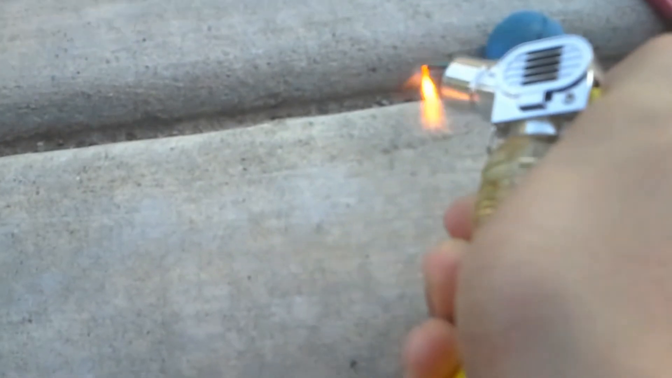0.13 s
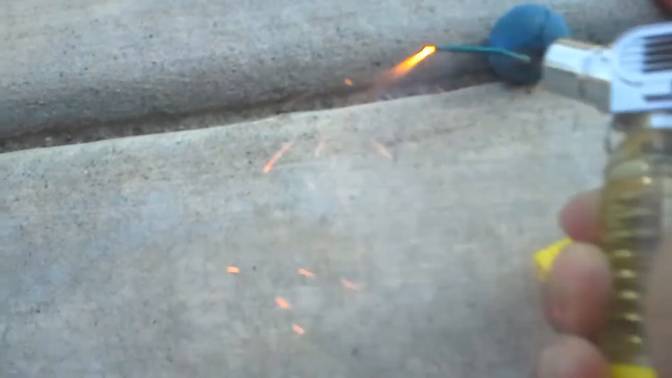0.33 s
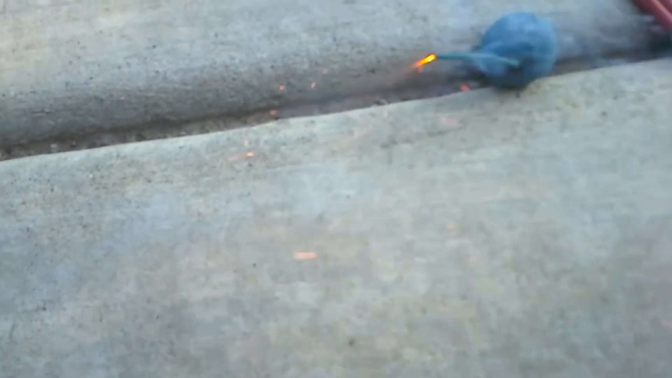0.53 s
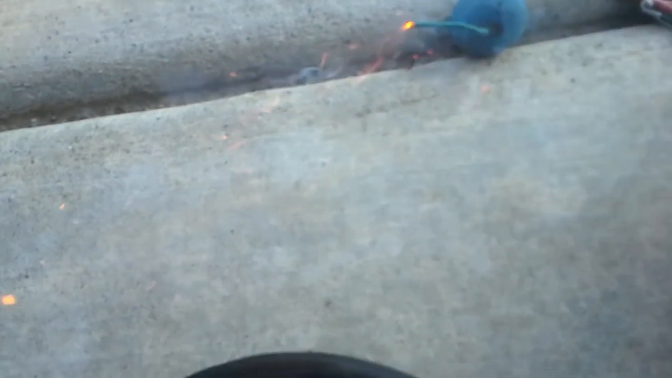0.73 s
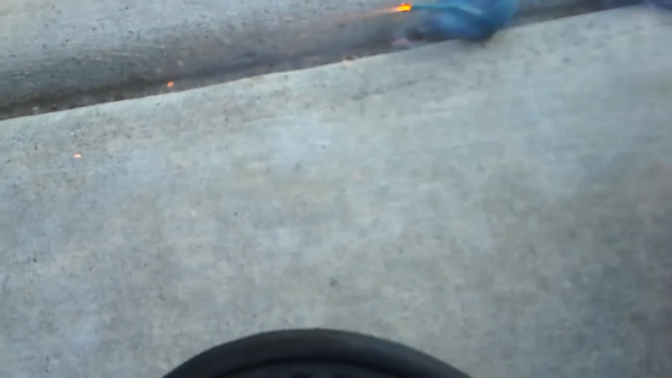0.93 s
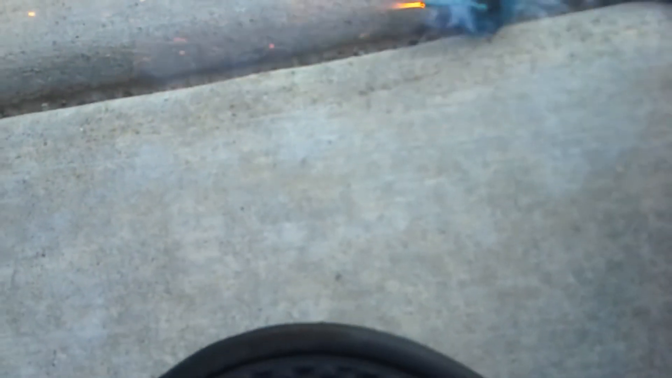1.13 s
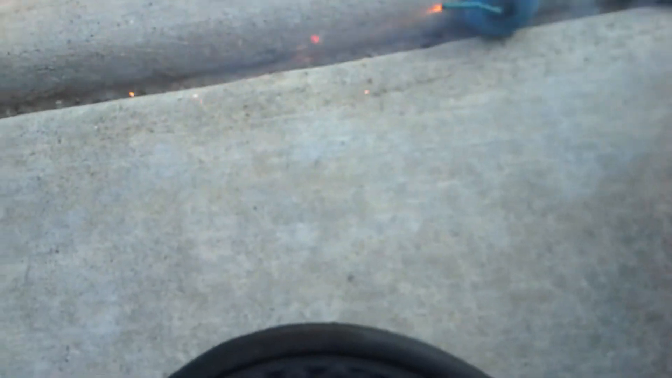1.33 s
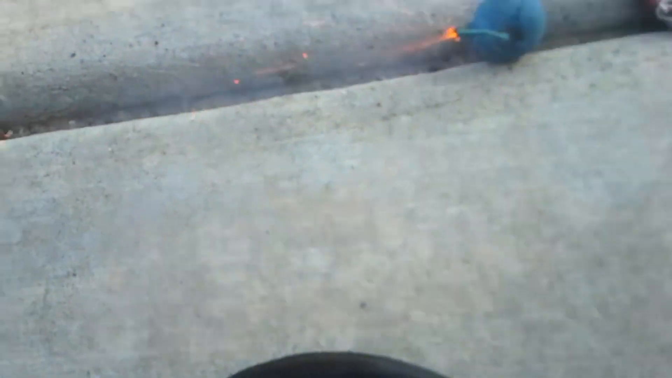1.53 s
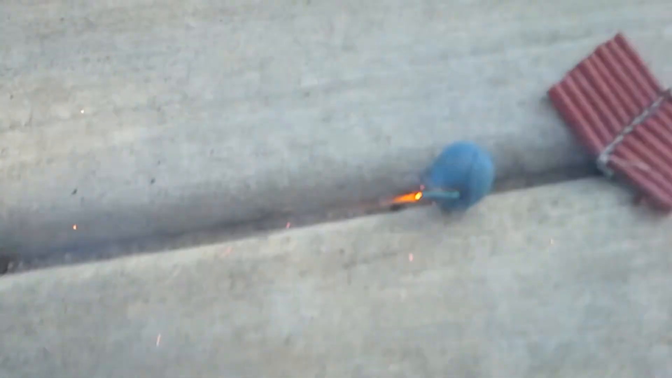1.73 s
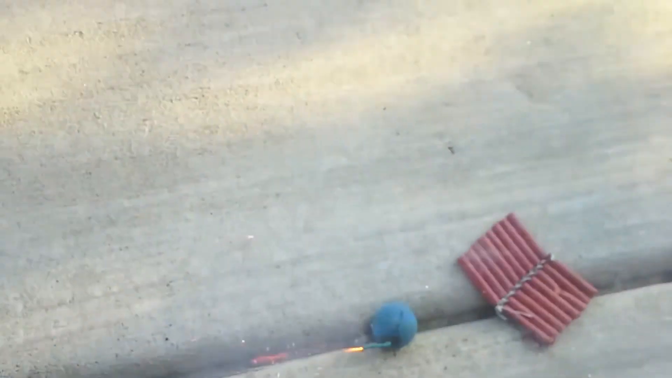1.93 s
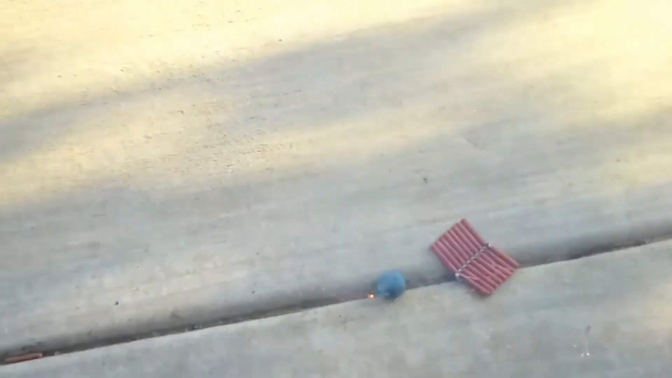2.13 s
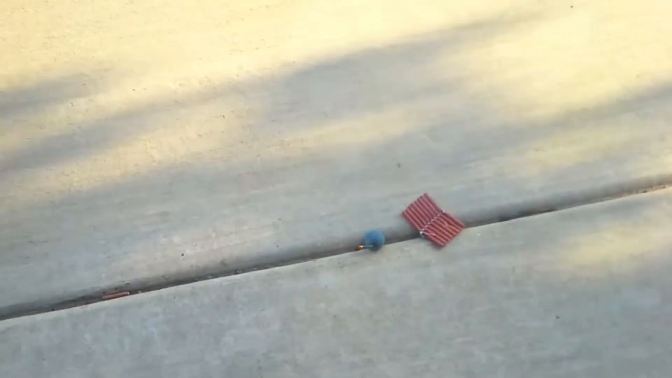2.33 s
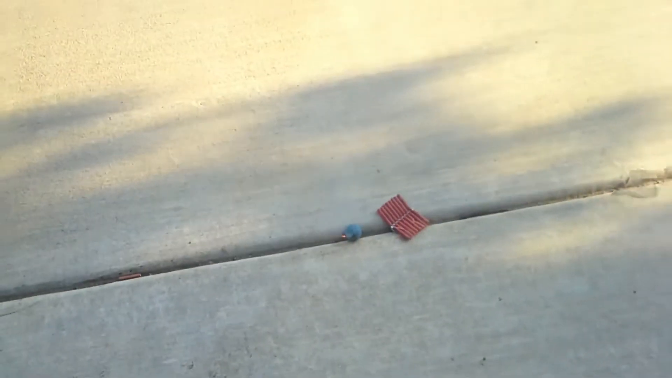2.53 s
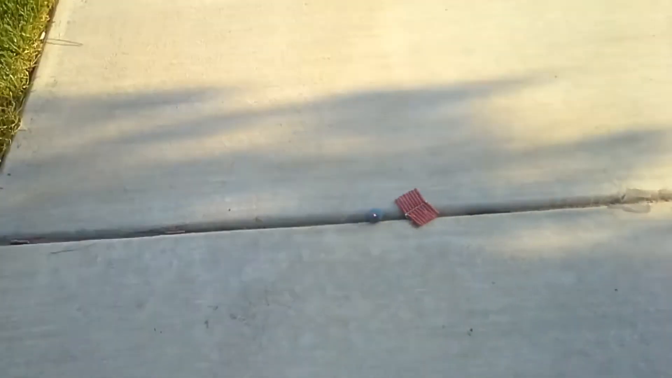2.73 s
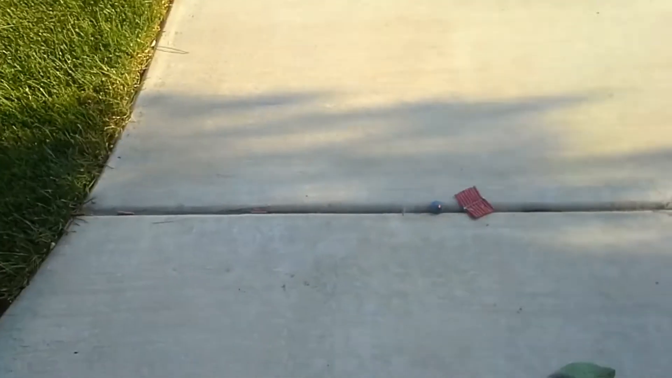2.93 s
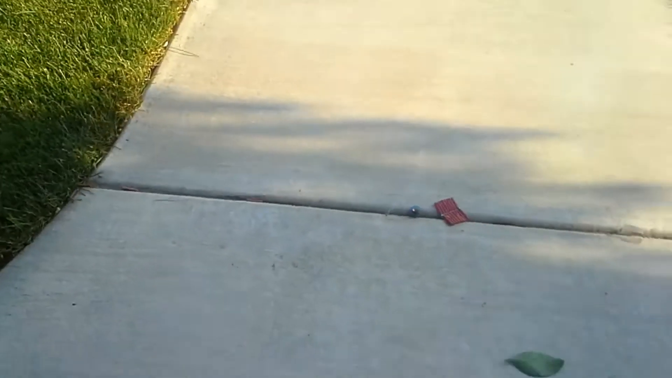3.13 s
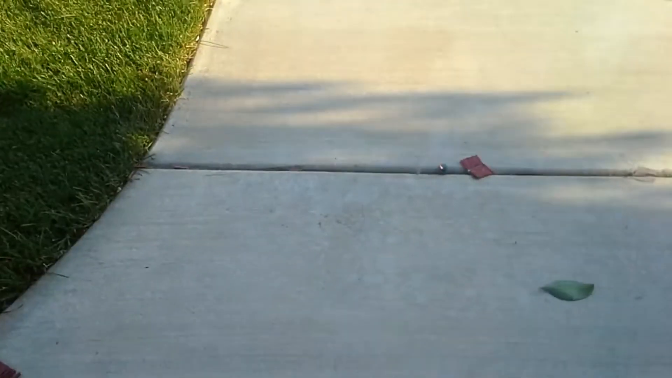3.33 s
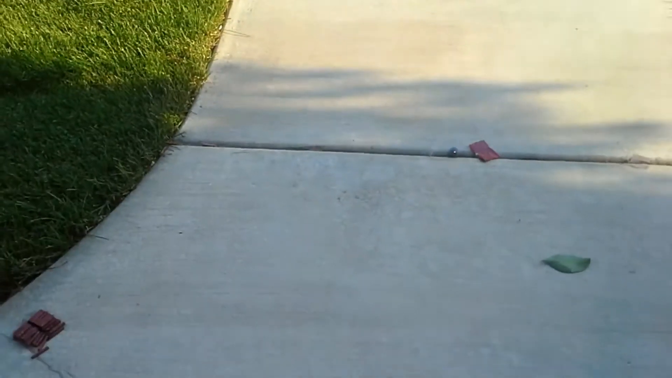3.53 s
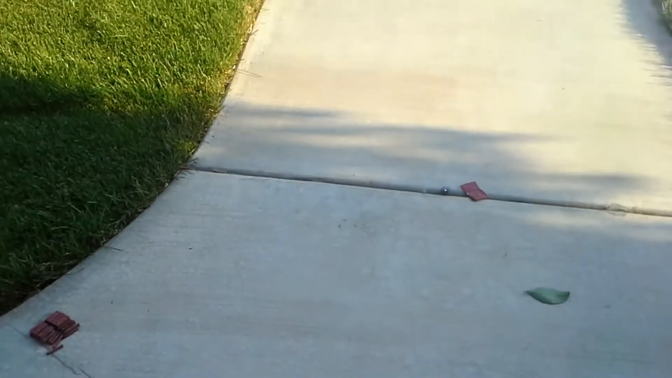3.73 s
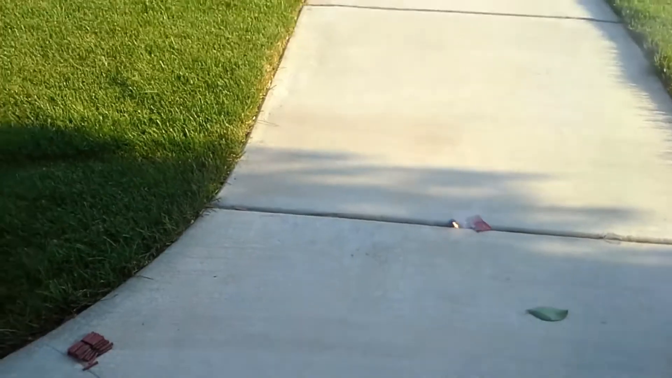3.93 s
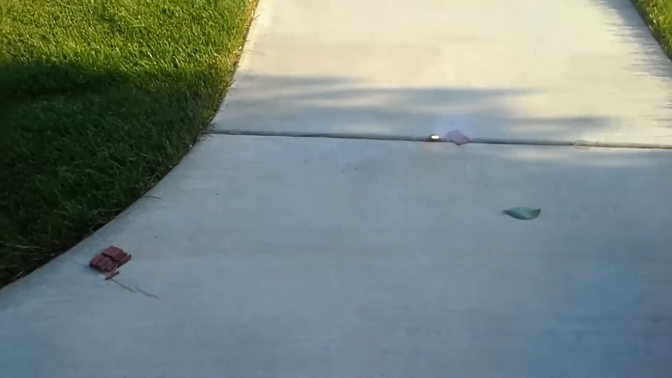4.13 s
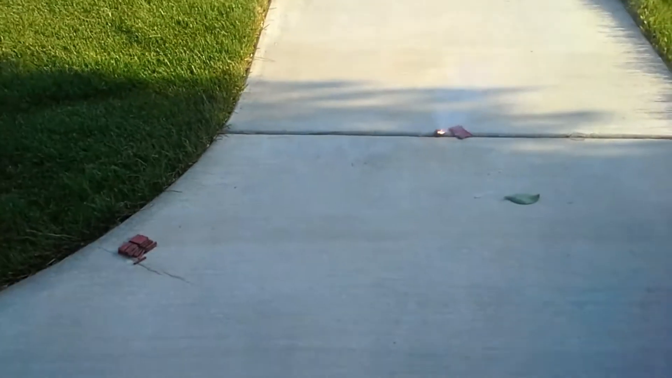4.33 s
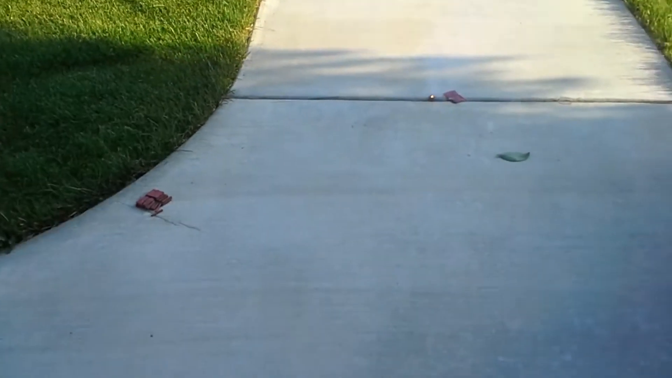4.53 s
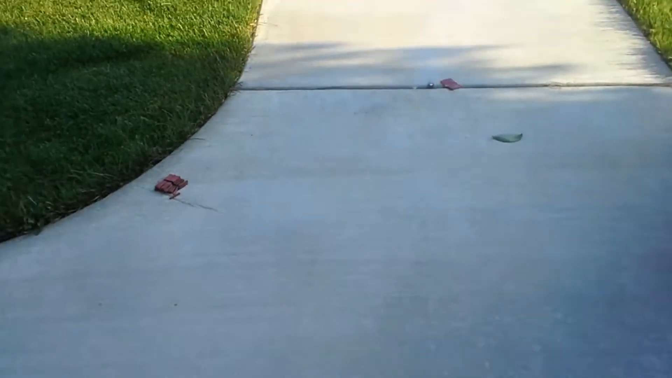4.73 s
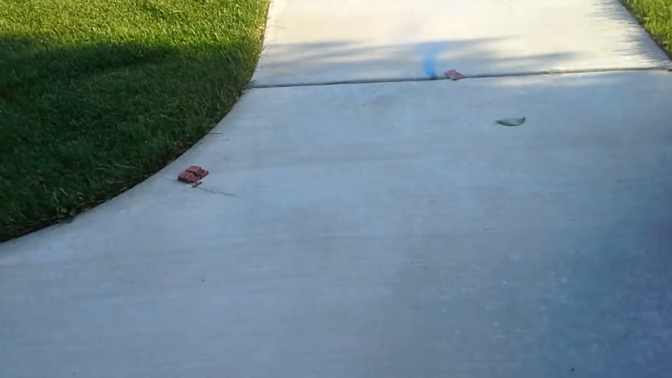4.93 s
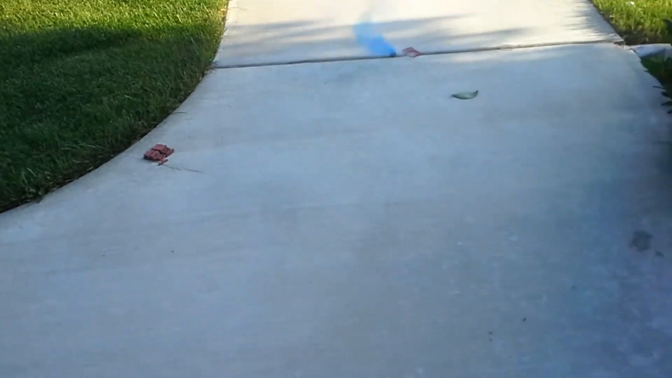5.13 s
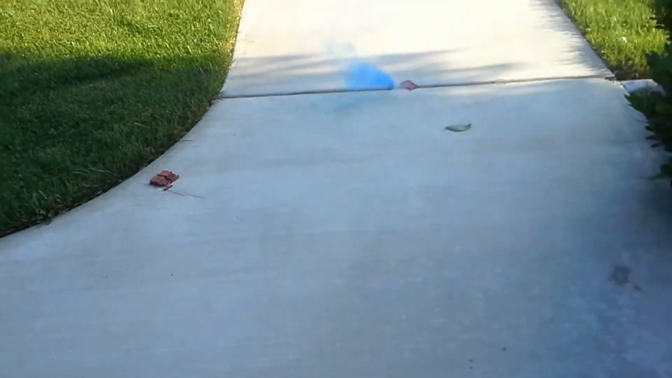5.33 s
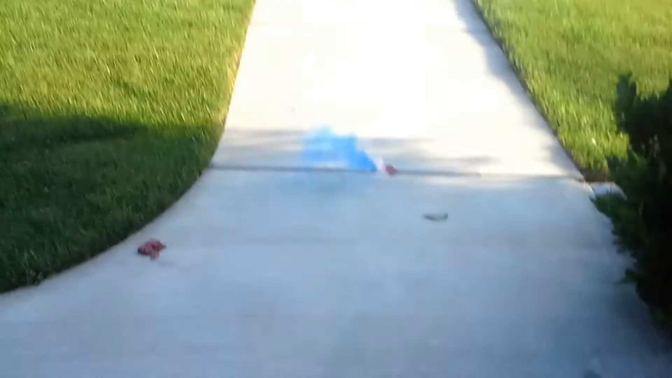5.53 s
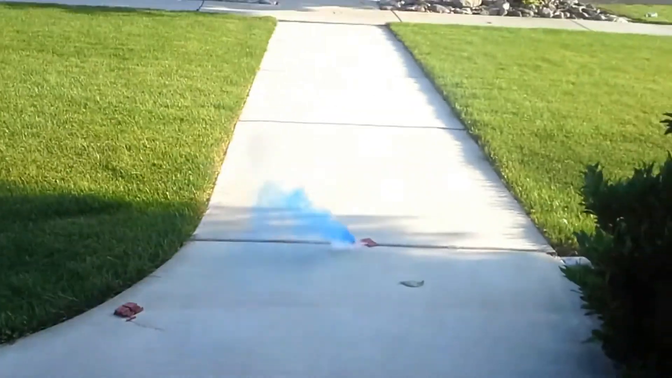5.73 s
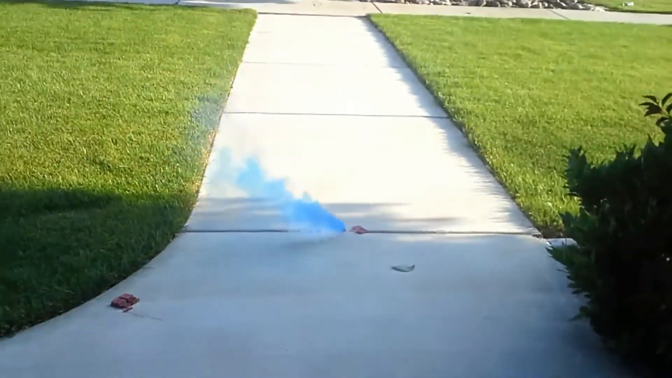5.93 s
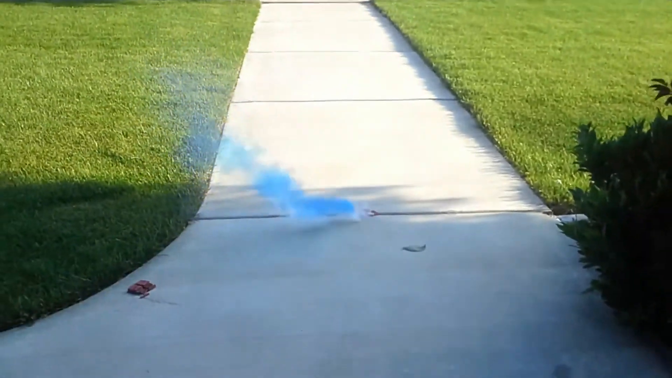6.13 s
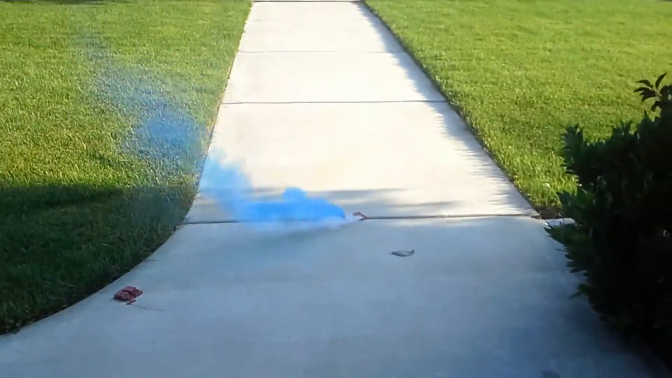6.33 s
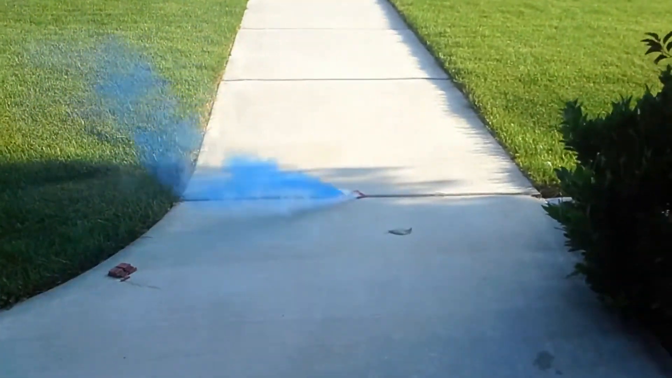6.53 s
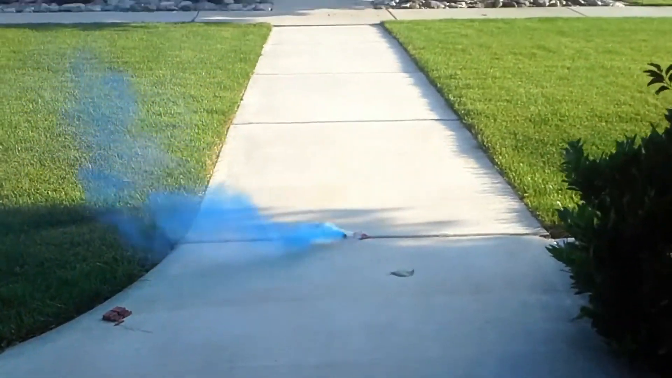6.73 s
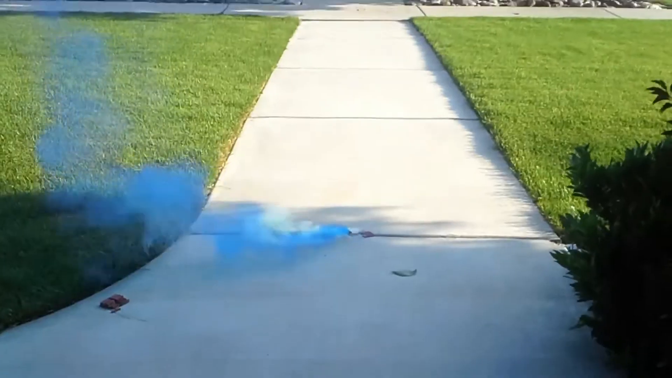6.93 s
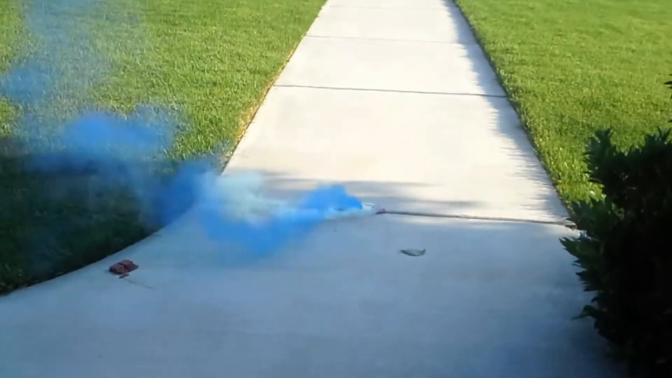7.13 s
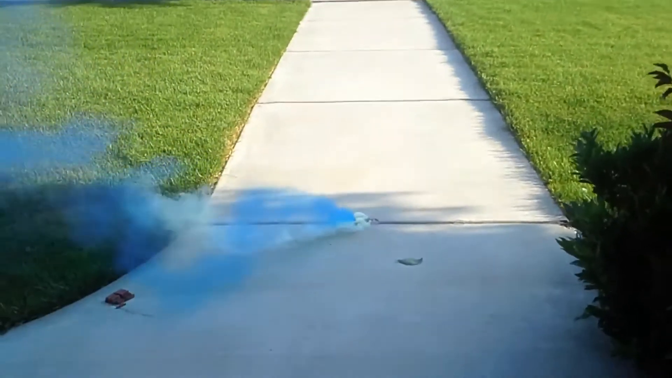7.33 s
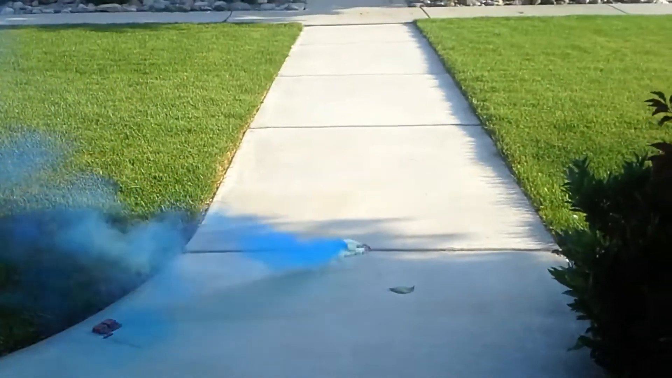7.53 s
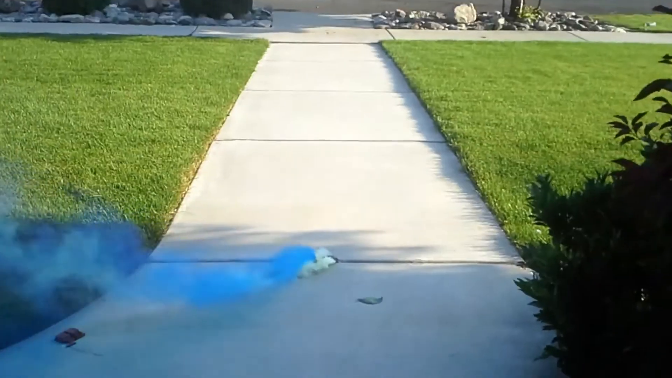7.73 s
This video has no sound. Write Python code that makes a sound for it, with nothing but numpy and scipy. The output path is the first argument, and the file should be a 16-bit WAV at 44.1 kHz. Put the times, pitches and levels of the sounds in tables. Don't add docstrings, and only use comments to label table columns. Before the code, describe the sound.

Close, bright fuse fizz with wind thumps and a sharp snap, dropping to faint spitting, finger rubs on the microphone, then a swelling smoky hiss.

```python
import sys
import numpy as np
from scipy import signal
from scipy.fft import rfft, irfft, dct, next_fast_len
from scipy.io import wavfile
from scipy.ndimage import uniform_filter1d

SR = 44100
rng = np.random.default_rng(int(sys.argv[2]) if len(sys.argv) > 2 else 0)


def unload_wav(signal):
    wavfile.write(
        sys.argv[1],
        SR,
        np.round(np.clip(np.atleast_2d(signal).T, -1, 1) * 32767).astype(np.int16),
    )


def invert_db(level):
    return 10 ** (np.asarray(level, dtype=float) / 20)


N = 347067
T = np.arange(N) / SR

# start/s, shut/s, held until/s, loss/dB
COVER = [
    (4.94, 4.998, 5.008, -36),
    (5.29, 5.335, 5.374, -42),
]


def rms_one(x):
    return x / np.sqrt(np.mean(x ** 2) + 1e-20)


def in_time(rows):
    s, *columns = np.transpose(rows)
    return [np.interp(T, s, column) for column in columns]


def between_covers():
    return (T > COVER[0][1]) & (T < COVER[1][1])


def drift(rate):
    pole = np.exp(-80 * np.pi * rate / SR)
    white = rng.standard_normal(N // 40 + 2002)
    slow = signal.lfilter([1], [1, -2 * pole, pole * pole], white)[2000:]
    return np.interp(np.arange(N) / 40, np.arange(len(slow)), rms_one(slow))


def grit(per_s, spread_db, share):
    sizes = invert_db(spread_db * np.minimum(rng.exponential(1, N), 4)) * rng.choice([-1, 1], N)
    clicks = rms_one(sizes * (rng.random(N) < per_s / SR))
    share = np.clip(share, 0, 1)
    return np.sqrt(1 - share) * rng.standard_normal(N) + np.sqrt(share) * clicks


def coloured(x, colour):
    size = next_fast_len(N)
    hz, level_db = np.transpose(colour)
    bins_hz = np.arange(size // 2 + 1) * SR / size
    shape = invert_db(np.interp(np.log(bins_hz + 1), np.log(hz), level_db))
    return rms_one(irfft(rfft(x, size) * shape, size)[:N])


def resonance(x, hz, t60_s):
    pole, w = invert_db(-60 / (t60_s * SR)), 2 * np.pi * hz / SR
    return signal.lfilter([0, np.sin(w)], [1, -2 * pole * np.cos(w), pole * pole], x + 1e-18)


def swell(start_s, length_s, rise):
    times_s = [start_s, start_s + rise * length_s, start_s + length_s * 0.72, start_s + length_s * 1.17]
    return np.interp(T, times_s, [0.013, 0.78, 0.39, 0.0029])


def spurting():
    # t/s, half width/s, gain/dB, brightening/dB
    spurts = [(0.45, 0.035, -4.5, -4), (0.52, 0.027, 2.5, 3), (0.91, 0.022, -2, -2), (1.072, 0.037, -6, -6),
              (1.16, 0.021, 1, -1.5), (1.212, 0.052, -3, -3.5), (2.538, 0.0093, 10, -2),
              (3.411, 0.03, 6, -1.5), (3.47, 0.057, -1.5, -5.5), (3.57, .03, 1.5, 0),
              (3.9, 0.093, 2.5, 9.5), (4.06, 0.21, 5, -12.5), (4.26, 0.056, 4.5, 0.5),
              (4.37, 0.082, 1, -9.5), (4.89, 0.041, 3, -8), (5.64, 0.03, -3.5, -5), (5.68, 0.017, 4.5, 2.5),
              (6.088, 0.076, 7, -0.5), (6.42, 0.052, -0.5, 1), (6.83, 0.041, 2.5, 5.5),
              (7.4, 0.057, -3.5, -5.5), (7.47, 0.061, 2, 0)]
    gain_tilt_db = np.zeros((2, N))
    for s, width_s, gain_db, tilt_db in spurts:
        gain_tilt_db += np.exp(-((T - s) / width_s) ** 2) * np.array([[gain_db], [tilt_db]])
    return gain_tilt_db


def burning(colour, source, patchy_db, flutter_db, echo_hz, low_db, hollows):
    # t/s, flow as hiss/dB, body roar re hiss/dB
    torch = [(0.0, -44, -10.5), (0.215, -41, -2.5)]
    fuse = [(0.235, -28, -4), (0.33, -27, 0), (0.41, -16.5, -9), (0.52, -15, -10.5), (1.7, -15, -10.5),
            (1.93, -19.5, -9.5), (2.04, -25, -11), (2.55, -28, -10.5), (3.17, -28, -15.5),
            (3.33, -37, -12.5), (3.6, -32.5, -13.5), (3.95, -35.5, -7.5), (4.2, -45.5, -6),
            (4.5, -43, -20), (4.63, -43, -13.5), (4.69, -35.5, -11), (4.92, -37, -28.5)]
    lull = [(5.02, -42.5, -26), (5.3, -44.5, -8), (5.39, -54, -10), (5.435, -47, -7)]
    jet = [(5.46, -34.5, -5), (5.6, -42, 1.5), (5.9, -38.5, -0.5), (6.1, -36.5, -2.5), (6.45, -37, -2.5),
           (6.8, -29.5, -7), (7.3, -29, -10), (7.87, -27.5, -12.5)]
    # t/s, top zone level/dB
    smoke = [(0, -7.5), (3.3, -7), (3.45, 1), (3.95, -7.5), (4.05, -1.5), (5.5, -8), (5.62, -11),
             (6.55, -17), (6.75, -10), (7.87, -15)]
    # t/s, lag/ms, strength/0-1
    echo = [(0, 0.43, 0.2), (2.0, .42, 0.3), (2.4, .44, 0.3), (3.3, 0.45, 0.35), (3.36, 0.19, 0.2),
            (4.12, 0.15, 0.3), (4.3, 0.306, 0.2), (5.5, 0.32, 0.31), (6.8, 0.3, 0.5), (7.87, 0.29, 0.4)]
    # f/Hz, zone number (fractions shared by two zones)
    zone_map = [(1150, 0), (2500, 1), (4600, 1), (6000, 2), (10400, 2), (12500, 3)]
    low_tilt, mid_tilt, top_tilt = -1.28, -0.47, 0.82
    torch_roar_db, torch_off_s, torch_fade_s = -35, 1, 0.13
    street_db, street_fade_db_per_s = -50.5, 0.63

    bright_db, roar_db = in_time(torch + fuse + lull + jet)
    gain_db, tilt_db = spurting()
    bright_db = bright_db + gain_db
    top_db = in_time(smoke)[0] + top_tilt * tilt_db

    street = invert_db(street_db - street_fade_db_per_s * T - bright_db) * np.where(between_covers(), .4, 1)
    lighter_on = np.interp(T, [torch_off_s, torch_off_s + torch_fade_s], [1, 0])
    below = street + invert_db(torch_roar_db - bright_db) * lighter_on

    lag_ms, strength = in_time(echo)
    dull = signal.lfilter(*signal.butter(1, echo_hz, fs=SR), source)
    read_at = np.arange(N) - lag_ms * SR / 1000 + SR / (2 * np.pi * echo_hz)
    source = source + strength * np.interp(read_at, np.arange(N), dull)

    size = next_fast_len(N)
    octave = np.log2(np.arange(size // 2 + 1) * SR / size + 1)
    spectrum = rfft(coloured(source, colour), size)
    hollow_db = sum(depth_db * np.exp(-((2 ** octave - hz) / width_hz) ** 2)
                    for hz, width_hz, depth_db in hollows)
    spectrum = spectrum * invert_db(hollow_db)

    zones = np.zeros((4, N))
    for centre in np.arange(7.67, 14.2, 1 / 3):
        window = np.cos(np.pi / 2 * np.clip(3 * (octave - centre), -1, 1)) ** 2
        band = irfft(spectrum * window, size)[:N]
        band *= invert_db(patchy_db * drift(7.9))
        place = np.interp(2 ** centre, *np.transpose(zone_map))
        for k in {int(place), int(np.ceil(place))}:
            zones[k] += band * (1 - abs(place - k))

    low, mid, bright, top = map(rms_one, zones)
    mix = np.hypot(invert_db(low_db + roar_db + low_tilt * tilt_db), below) * low
    mix += invert_db(roar_db + mid_tilt * tilt_db) * mid
    mix += bright + invert_db(top_db) * top
    return invert_db(bright_db + flutter_db * (drift(42) + 1.4 * drift(60))) * mix


def gusting():
    gusts = [(0.0, 0.097, -30.5), (0.17, 0.0069, -22.5), (0.28, 0.024, -21.5), (0.38, 0.14, -28),
             (0.74, 0.011, -46), (0.88, 0.027, -38.5), (1.75, 0.088, -35), (2.08, 0.056, -30),
             (2.301, 0.017, -30.5), (2.541, 0.0093, -33), (2.74, 0.0064, -30), (2.96, 0.012, -44),
             (3.18, 0.039, -47), (3.42, 0.0089, -46), (3.77, .01, -40.5), (3.86, .1, -42), (4.12, .01, -43),
             (4.65, 0.1, -46.5), (4.8, 0.19, -39.5), (5.39, .01, -34), (5.55, 0.0085, -26),
             (5.66, 0.02, -42), (5.81, 0.033, -41), (6.25, .01, -37.5), (6.5, 0.11, -36), (6.65, .2, -31.5),
             (6.93, .01, -30), (7.0, 0.17, -38.5), (7.53, 0.036, -29), (7.68, 0.12, -38.5)]
    rise_db_per_s, fall_db_per_s, calm_db = 166, 141, -53
    power = invert_db(2 * calm_db)
    for s, held_s, level_db in gusts:
        rise_db = rise_db_per_s * np.maximum(s - T, 0)
        fall_db = fall_db_per_s * np.maximum(T - s - held_s, 0)
        power = power + invert_db(2 * (level_db - rise_db - fall_db))
    return np.sqrt(power)


def wind():
    # f/Hz, level/dB per Hz
    wind_colour = [(12, -45), (20, 8.5), (65, 7.5), (190, -9), (255, -20), (334, -14.5), (372, -26),
                   (500, -25), (650, -27), (1100, -120)]
    # t/s, peak/dB
    thumps = [(0.172, -18), (0.22, -29), (0.248, -25), (0.259, -17), (0.29, -16), (0.307, -15),
              (2.079, -30), (2.529, -34), (2.547, -28.5), (2.721, -32), (4.124, -19.5), (4.643, -32),
              (4.865, -33.5), (5.392, -34), (5.483, -32), (5.549, -24), (6.237, -31), (6.619, -22),
              (6.635, -27), (6.667, -12.5), (6.699, -22.5), (6.813, -22), (6.846, -28), (6.918, -23),
              (7.158, -27.5), (7.512, -24), (7.548, -26.5), (7.588, -22), (7.648, -22), (7.69, -35)]
    # start/s, length/s, level/dB, f/Hz
    moans = [
        (3.99, 0.28, -39.5, 583),
        (4.2, 0.092, -43, 680),
        (4.274, 0.21, -38, 650),
        (4.45, 0.15, -43.5, 700),
        (6.346, 0.13, -35.5, 658),
        (6.484, 0.31, -40, 732),
        (6.735, 0.15, -41, 783),
        (7.016, 0.062, -39.5, 703),
        (5.942, 0.59, -49, 1300),
        (7.178, 0.21, -41.5, 760),
    ]
    thump_hz = 177
    out = gusting() * invert_db(-1.5 + 3.94 * drift(25)) * coloured(rng.standard_normal(N), wind_colour)
    for s, peak_db in thumps:
        near = slice(int((s - .02) * SR), int((s + .03) * SR))
        cycle = (T[near] - s) * thump_hz - .4
        out[near] += invert_db(peak_db + 17) * cycle * np.exp(-6.5 * cycle ** 2)
    air = rng.standard_normal(N) * invert_db(1.3 * drift(54))
    for s, length_s, level_db, hz in moans:
        tone = resonance(resonance(air, hz, .011), hz, .011)
        out += invert_db(level_db) * swell(s, length_s, 0.2) * rms_one(tone)
    return out


def scuffs():
    # start/s, length/s, level/dB, centre f/Hz, width/octaves
    strokes = [(0.23, 0.15, -24.5, 300, 1.4), (7.31, 0.075, -37, 390, 1.9), (3.36, .25, -37, 2200, 0.5),
               (2.533, 0.018, -18, 4000, 4.3), (2.736, 0.0055, -21.5, 1200, 3.2),
               (2.79, 0.039, -27, 2500, 2.5), (2.634, 0.021, -34, 620, 2.3),
               (3.346, 0.019, -34.5, 2100, 2.3), (6.69, 0.078, -44, 2500, 2.1),
               (7.171, 0.03, -27.5, 1100, 4.1), (7.274, 0.035, -22, 4500, 0.8),
               (7.309, 0.064, -27.5, 1500, 3.1)]
    out = np.zeros(N)
    grains = grit(1500, spread_db=-3.5, share=0.22)
    for s, length_s, level_db, hz, octaves in strokes:
        edges_hz = np.clip(hz * 2. ** (np.array([-.5, .5]) * octaves), 50, .45 * SR)
        band = signal.butter(2, edges_hz, "band", fs=SR, output="sos")
        out += invert_db(level_db) * swell(s, length_s, 0.22) * rms_one(signal.sosfilt(band, grains))
    return out


def handling():
    # t/s, level/dB
    rub = [(5.004, -70), (5.018, -46), (5.032, -25), (5.1, -31), (5.122, -20), (5.139, -30), (5.148, -48),
           (5.168, -52), (5.178, -36), (5.202, -26), (5.236, -28.5), (5.255, -48), (5.3, -52),
               (5.32, -85)]
    # f/Hz, level/dB per Hz
    rub_colour = [(710, -83), (1200, -53), (1540, -60), (2200, -25.5), (3490, -16), (4150, -5), (4930, -15),
                  (6810, -0.5), (8450, -11.5), (13400, -24.5), (15800, -34)]
    # t/s, peak/dB, low-mode share/dB
    ticks = [
        (1.9513, 9.5, -7),
        (5.0177, -23, -14),
        (5.178, -30, -10),
        (5.4142, -27, 14),
        (5.4334, -35, -3),
        (5.448, 7, -4.5),
    ]
    # f/Hz, level/dB, t60/s
    housing = [(4120, -6.5, 0.034), (5860, -0.5, 0.0082), (6520, 0, 0.0062), (2500, -43, .008),
               (12300, -21, .003), (4700, -15, 0.0057), (9600, -11, 0.0017), (15000, -27, .002)]
    stroke = invert_db(in_time([(5.0, -95)] + rub + [(5.378, -100)])[0])
    out = stroke * coloured(grit(2500, spread_db=4.5, share=0.45), rub_colour)
    s, peak_db, low_db = np.transpose(ticks)
    for hz, level_db, t60_s in housing:
        clicks = np.zeros(N)
        clicks[(s * SR).astype(int)] = invert_db(peak_db + level_db - 15.5 + low_db * (hz < 5000))
        out += resonance(clicks, hz, t60_s)
    return out


def knocks():
    # t/s, peak/dB, f/Hz
    cracks = [
        (2.533, -20, 2480),
        (2.63, -24, 650),
        (2.737, -13, 1010),
        (3.346, -17, 2480),
        (5.903, -24.5, 724),
        (7.175, -14.5, 2400),
    ]
    out = np.zeros(N)
    for s, peak_db, hz in cracks:
        click = np.zeros(2000)
        click[0] = invert_db(peak_db)
        start = int(s * SR)
        out[start:start + 2000] += resonance(click, hz, 5.0 / hz)
    return out


def covering():
    resting_db, lift_s = -1, .008
    loss = resting_db * between_covers()
    for start, shut, until, loss_db in COVER:
        loss = loss + loss_db * np.interp(T, [start, shut, until, until + lift_s], [0, 1, 1, 0])
    return invert_db(loss)


def scene():
    # f/Hz, level/dB per Hz
    fuse_colour = [(250, -13), (550, -3), (1000, 0.5), (2300, -8.5), (4500, -8.5), (6000, -11.5),
                   (8200, -2.5), (9500, -5.5), (12500, -10.5), (15800, -4)]
    # f/Hz, level/dB per Hz
    jet_colour = [(250, -25.5), (500, -34), (750, -22.5), (1050, -26.5), (1350, -21), (2700, -14),
                  (3900, -15.5), (5200, -13.5), (6800, -8), (8500, -8.5), (11100, -22), (13000, -32),
                  (15800, -29.5)]
    # f/Hz, half width/Hz, depth/dB
    fuse_hollows = [(3473, 550, -2.5), (5790, 450, -2), (11270, 530, -1.5)]
    # f/Hz, half width/Hz, depth/dB
    jet_hollows = [(4760, 460, -1.5), (10450, 600, -1)]
    lit = np.interp(T, [1.95, 2.1, 3.25, 3.9], [0, .25, .3, 1])
    fuse = burning(fuse_colour, grit(1800, spread_db=4.5, share=0.091), patchy_db=1.0, flutter_db=0.85,
                   echo_hz=6230, low_db=-2.0, hollows=fuse_hollows)
    jet = burning(jet_colour, grit(1200, spread_db=4.0, share=0.076), patchy_db=1.5, flutter_db=0.69,
                  echo_hz=6770, low_db=-15, hollows=jet_hollows)
    outside = np.sqrt(1 - lit) * fuse + np.sqrt(lit) * jet + wind() + scuffs() + knocks()
    mono = outside * covering() + handling()
    return np.array([mono, mono])


def thinned(x, step_db, uneven_db, from_hz):
    hop = 1024
    window = np.sin(np.pi * (np.arange(2 * hop) + .5) / (2 * hop))
    padded = np.pad(x, (hop, 2 * hop))
    frames = np.lib.stride_tricks.sliding_window_view(padded, 2 * hop)[::hop] * window
    a, b, c, d = np.split(frames, 4, axis=1)
    lines = dct(np.hstack([-c[:, ::-1] - d, a - b[:, ::-1]]), type=4, norm="ortho")

    masking = np.sqrt(uniform_filter1d(lines ** 2, size=72, axis=1) + 1e-20)
    uneven = np.repeat(rng.standard_normal((len(lines), hop // 8)), 8, axis=1)
    lines_hz = np.arange(1, hop + 1) * SR / (2 * hop)
    finer_low = np.clip(lines_hz / from_hz, 1e-3, 1) ** 2.8
    step = masking * invert_db(step_db + uneven_db * uneven) * finer_low
    step[:, hop * 20000 // SR:] *= invert_db(1.0)

    sudden = np.abs(np.log((np.diff(a).std(1) + 1e-9) / (np.diff(d).std(1) + 1e-9))) > 1.7
    peaky = np.abs(frames).max(1) > 7 * frames.std(1)
    step[sudden | peaky] *= .05

    rounded = step * np.sign(lines) * np.floor(np.abs(lines) / step + .4)
    first, second = np.split(dct(rounded, type=4, norm="ortho"), 2, axis=1)
    frames = np.hstack([second, -second[:, ::-1], -first[:, ::-1], -first]) * window
    return (frames[1:, :hop] + frames[:-1, hop:]).ravel()[:N]


def top_cut(x):
    return signal.sosfilt(signal.butter(12, 16400, fs=SR, output="sos"), x)


def record(dry):
    rounded = .85 * np.tanh(dry[0] / .85)
    thin = thinned(rounded, step_db=6.2, uneven_db=1.5, from_hz=2700)
    low_pass = signal.ellip(12, .5, 70, 15690, fs=SR, output="sos")
    cut = signal.sosfilt(low_pass, thin)
    return top_cut(np.array([cut, cut]))


dry = scene()
out = record(dry)
unload_wav(out)
```